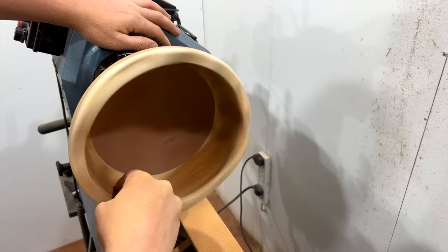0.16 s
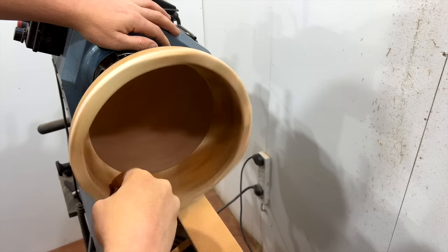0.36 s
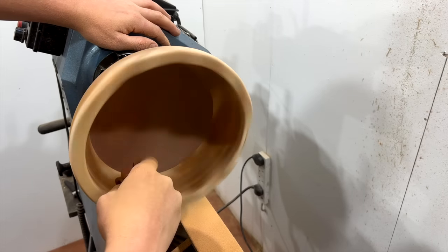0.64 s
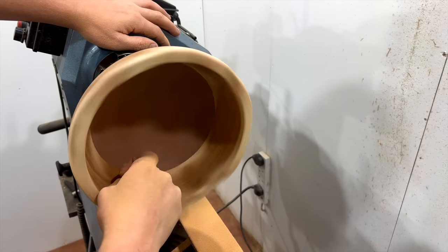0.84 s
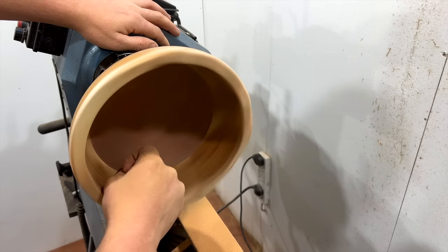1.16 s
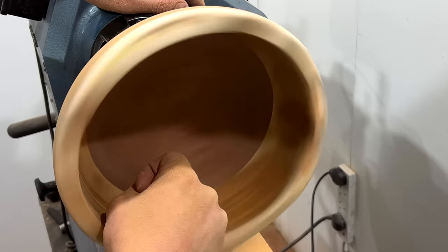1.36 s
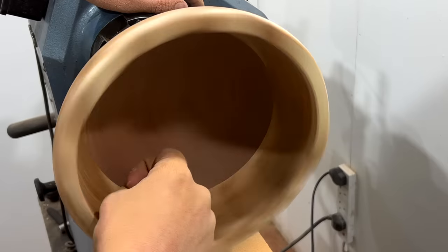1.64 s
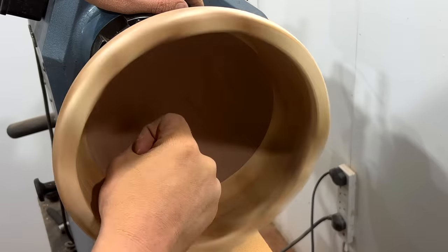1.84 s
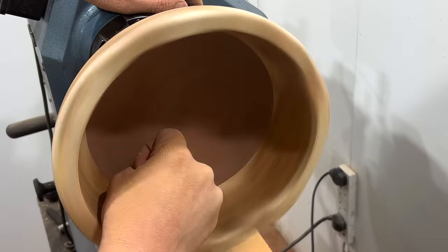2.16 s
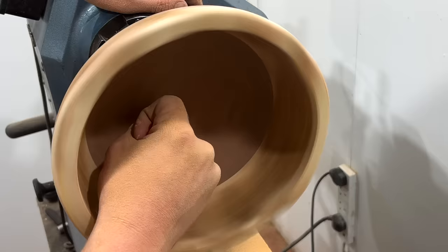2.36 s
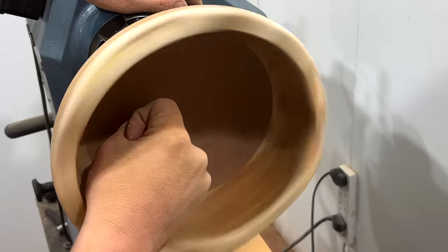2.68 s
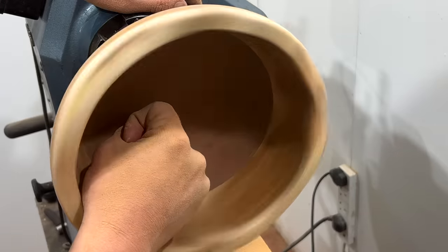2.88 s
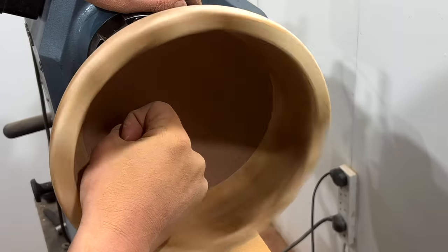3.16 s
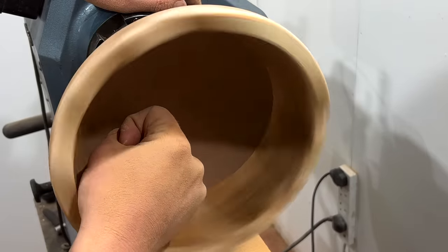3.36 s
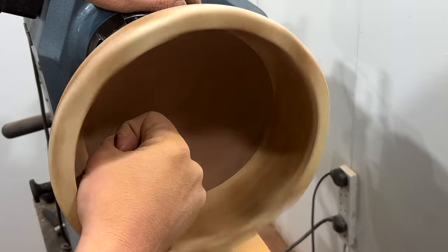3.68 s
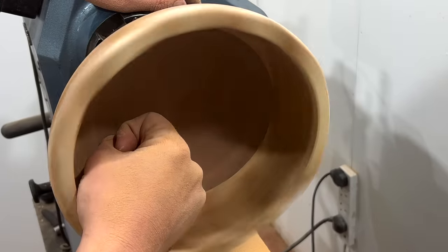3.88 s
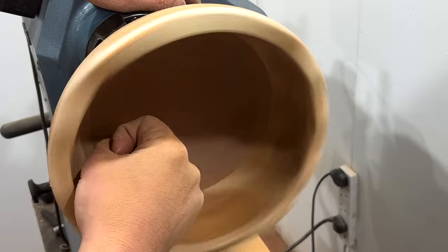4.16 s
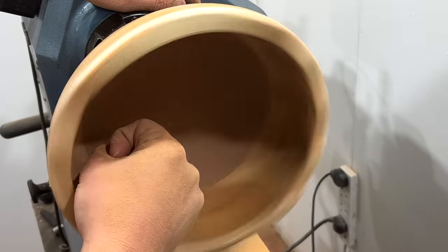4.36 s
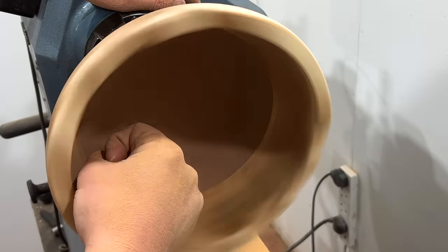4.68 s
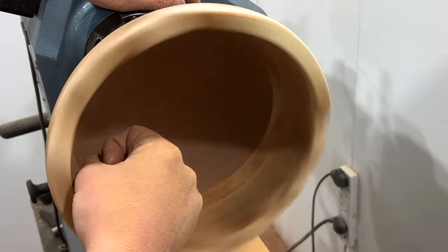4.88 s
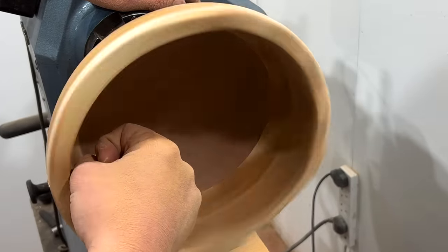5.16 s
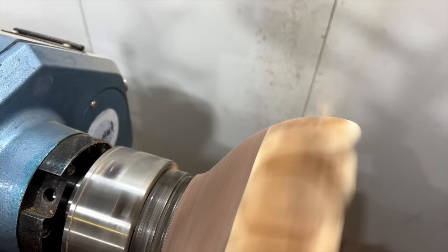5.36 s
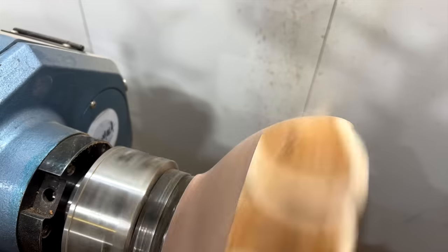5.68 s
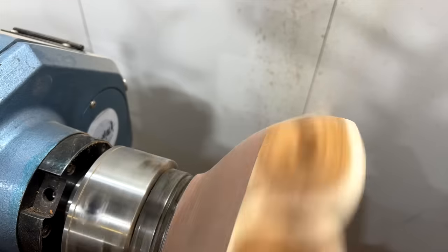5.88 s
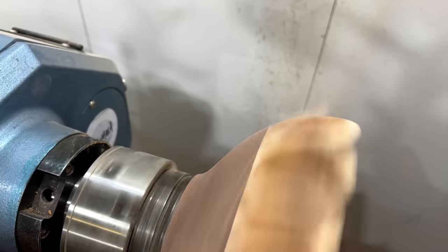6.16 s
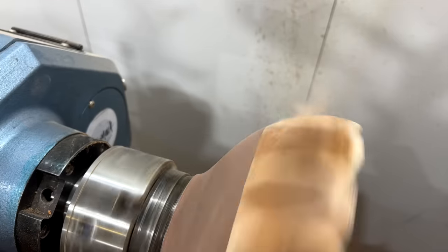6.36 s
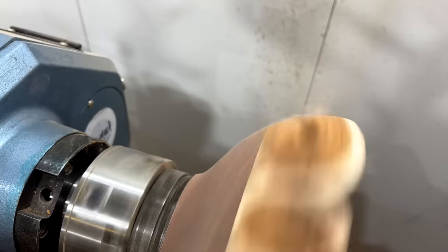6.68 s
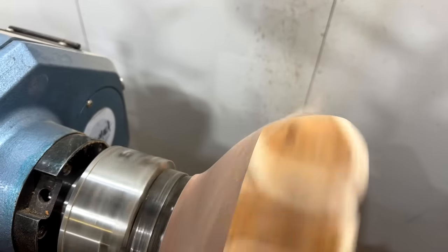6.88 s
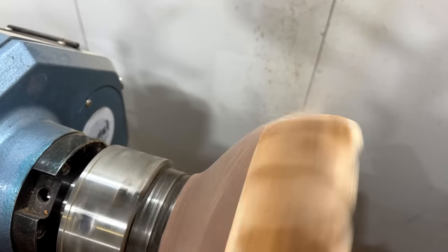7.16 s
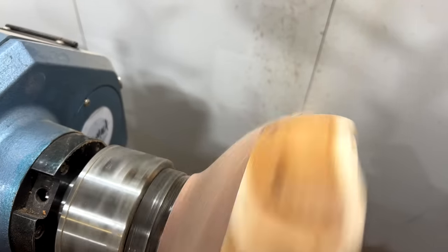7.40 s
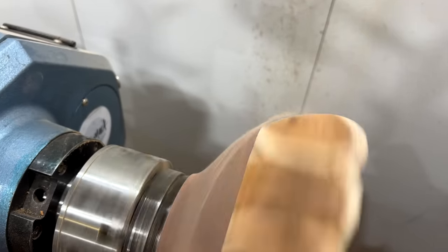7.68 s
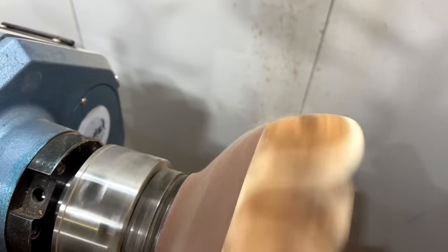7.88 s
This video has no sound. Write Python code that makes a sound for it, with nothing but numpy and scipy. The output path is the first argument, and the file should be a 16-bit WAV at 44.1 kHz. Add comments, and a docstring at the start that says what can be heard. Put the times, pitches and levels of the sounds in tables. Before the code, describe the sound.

Close stereo pickup facing a spinning wooden bowl: soft abrasive hiss, then a sudden firm press, with narrow singing chatter, short edge rasps and a woody ring. The hiss becomes smoother and the ring fades deep in the hollow. The sound then blends to a position by the lathe, where pulsing sanding of the outer wall rides over slowly swelling low drone, churning belt and whine, short room reflections around it.

```python
"""A wooden bowl spins on a lathe at about 900 rpm, in a dull workshop; sandpaper hisses with every turn.
At first the paper rests lightly, and two loose grains click. Then a hand presses it hard inside the bowl:
the stiff paper sings, its edge scuffs, and the bowl's wall rings. The hand goes deep, then comes back up;
the ring fades with depth and the air in the hollow hums. At about 5 s a short crossfade leads to a second
view, beside the headstock: the outer wall is rubbed, belt, whine and droning frame stand out; the hand eases off."""
import sys
import numpy as np
from scipy import signal
from scipy.fft import rfft, irfft, next_fast_len
from scipy.io import wavfile

SR = 44100
rng = np.random.default_rng(int(sys.argv[2]) if len(sys.argv) > 2 else 0)


def wav_out(sig):
    """Save sig, one row per channel (or a flat mono array), as 16-bit PCM at SR to the path in sys.argv[1]."""
    wavfile.write(sys.argv[1], SR, np.round(np.clip(np.atleast_2d(sig).T, -1, 1) * 32767).astype(np.int16))


N = 354123
TIME = np.arange(N) / SR
FREQ = np.arange(N // 2 + 1) * SR / N
SPINDLE_HZ = 15.15  # turns of the bowl per second


def undb(db):
    """Turn decibels into a gain."""
    return np.exp(np.asarray(db) * (np.log(10) / 20))


def unit(x):
    """Scale to an average strength (rms) of 1."""
    return x / np.sqrt(np.mean(x ** 2))


def curves(table):
    """Read each column of a time table, sample by sample."""
    s, *columns = np.transpose(table)
    return [np.interp(TIME, s, column) for column in columns]


def spectra(table):
    """Read each column of a frequency table, on a log-frequency axis."""
    hz, *columns = np.transpose(table)
    return [np.interp(np.log(FREQ + 1), np.log(hz), column) for column in columns]


def shape(x, response):
    """Filter a sound: scale (and shift) each frequency by the response."""
    size = next_fast_len(N)
    bins_hz = np.arange(size // 2 + 1) * SR / size
    return irfft(rfft(x, size) * np.interp(bins_hz, FREQ, response), size)[..., :N]


def mode(hz, width_hz):
    """Response of one resonance, with gain 1 at its centre."""
    damping = 1j * FREQ * width_hz
    return damping / (hz ** 2 - FREQ ** 2 + damping)


def noise():
    """White noise: all frequencies equally strong."""
    return rng.standard_normal(N)


def walk(rate):
    """A random wander with rms 1, drawn through this many points per second."""
    knots = rng.standard_normal(4096)
    return unit(np.interp(TIME * rate, np.arange(len(knots)), knots))


def ramp(start_s, length_s):
    """Rise from 0 to 1 in a straight line, then stay."""
    return np.clip((TIME - start_s) / length_s, 0, 1)


def bump(centre_s, half_s):
    """A smooth rise to 1 and fall."""
    return np.exp(-np.minimum(((TIME - centre_s) / half_s) ** 2, 20))


# the hand presses the paper on: start t/s, end t/s, attack/s, release/s, hiss level/dB above a light touch,
# angle of the high spot/turns, drift of that angle/turns per s, once-a-turn throb/dB, twice-a-turn throb/dB
HAND_PRESSES = [(.765, 1.625, .11, .125, 8.9, .45, .07, 2.6, .2),
                (1.56, 1.98, .12, .13, 8.4, .88, 0, 0, .5), (1.93, 2.34, .1, .035, 7.4, .92, 0, .5, 1.6),
                (2.31, 5.25, .48, .45, 5.0, .775, 0, .2, 1.5),
                (5.11, 8.55, .45, 1.45, 6.5, .715, .13, 2.75, .95)]


def pressing():
    """Hand pressure as dB above a light touch: each press rises, holds and lets go."""
    return np.max([db * ramp(start, attack) * (1 - ramp(end - release, release))
                   for start, end, attack, release, db, *_ in HAND_PRESSES], axis=0)


# the paper resting lightly: angle of the high spot in turns, throbs in dB
TOUCH_ANGLE, TOUCH_ONCE_DB, TOUCH_TWICE_DB = 0.16, 1, 0.7


def runout(settle_s=0.083):
    """The bowl runs out of true; each press meets its high spot at a new angle.

    Gives the angle in turns, the once-a-turn throb in dB and the twice-a-turn throb in dB."""
    state = np.array([[TOUCH_ANGLE], [TOUCH_ONCE_DB], [TOUCH_TWICE_DB]])
    for start, _, _, _, _, angle, drift, once_db, twice_db in HAND_PRESSES:
        held = np.array(np.broadcast_arrays(angle + drift * (TIME - start), once_db, twice_db))
        state = state + (held - state) * ramp(start - settle_s / 2, settle_s)
    return state


# the high spot shows most in the fine hiss: centre of band f/Hz, share of the throb (0-1)
THROB_SHARES = [(1500, 0.15), (3000, 0.36), (5000, 0.77), (7500, 0.88), (13000, 0.99)]


def grit(figure_db=0.74, flutter_db=0.64, grain_db=2.5, shift_db=0.36):
    """Countless grains scratch the wood, harder whenever a high spot or the end grain comes round."""
    angle, once_db, twice_db = runout()
    turn = SPINDLE_HZ * TIME - angle
    throb_db = once_db * np.cos(2 * np.pi * turn) - twice_db * np.cos(4 * np.pi * turn)
    # the wood's figure repeats on every turn; the paper flutters at random
    marks = rng.standard_normal(size=24)
    steps = unit(marks - np.roll(marks, 1))
    figure = np.interp(turn, np.arange(len(marks)) / len(marks), steps, period=1)
    grains = unit(noise() * undb(grain_db * noise()))
    grains = grains * undb(figure_db * figure + flutter_db * walk(260))
    # each band throbs by its own amount and wanders a little in level
    centres, shares = np.transpose(THROB_SHARES)
    bands = spectra(np.column_stack([centres, np.eye(len(centres))]))
    scratch = 0
    for band, share in zip(bands, shares):
        scratch = scratch + shape(grains, band) * undb(share * throb_db + shift_db * walk(30))
    return unit(scratch)


# colour of the grit: f/Hz, then level/dB for each grip:
# 0 light touch, 1 pressed on the inner wall, 2 deep in the hollow, 3 outer wall
GRIP_COLOURS = [(760, -17, -27.5, -29.5, -26.5), (1420, -14, -20, -18, -23), (2080, -16.5, -23, -21.5, -23),
                (2860, -12, -12.5, -9.5, -12.5), (3460, -7.5, -7.5, -7.5, -10.5),
                (4100, -7.5, -6, -5.5, -6), (4860, -0.5, 0, 0, -2.5), (6620, -6, -3, -1.5, -7.5),
                (6960, -5.5, -0.5, -2, -8), (8610, -3, -1.5, 1.5, -0.5), (9960, -17, -9.5, -7, -10),
                (11280, 1, -2, -1, -1.5), (13300, -5.5, -4.5, -4.5, -3), (15500, 0, -6, -7.5, 0)]
# the hand changes grip: t/s, grip number (0-3, as above)
GRIP_CHANGES = [(.71, 0), (.82, 1), (2.3, 1), (2.4, 2), (4.95, 2), (5.42, 3)]
# wall resonances that colour the hiss: f/Hz, width/Hz, lift level/dB
WALL_RESONANCES = [(1713, 86, 5.5), (1900, 68, -1.5), (2136, 63, 2.5), (2437, 187, 9), (2690, 120, -7),
                   (2863, 126, 3), (3176, 150, 2.5), (4080, 140, 2.5), (4250, 130, -2), (4880, 110, 1),
                   (5100, 170, 0.5)]
# the top treble: t/s, level/dB relative to the hiss
TREBLE_LEVEL = [(0, -0.5), (.5, -0.5), (.84, -5.5), (1.15, 0.5), (1.35, -3), (1.6, -2), (1.8, -8),
                (2.2, -5), (2.5, -5.5), (2.9, -4), (4.5, -3.5), (5.4, -2), (7.3, -3.5), (8.03, -3.5)]
TOUCH_DB = -31.5  # hiss level under a light touch
# the coarse low hiss: level at a light touch, dB lost per dB of pressing, change at the bottom and outside
COARSE_DB, COARSE_LOSS, COARSE_BOTTOM_DB, COARSE_OUTSIDE_DB = -8, 0.35, -7.5, -1


def sanding(scratch, near, depth, grip_db=(0, 0, 0, 0), coarse_hz=3550, fine_hz=10500, depth_power=3.8):
    """The scratching takes the colour of each grip; pressing harder weakens its coarse low part."""
    press_db = pressing()
    coarse_db = COARSE_DB - COARSE_LOSS * press_db
    coarse_db = coarse_db + COARSE_BOTTOM_DB * depth ** depth_power + COARSE_OUTSIDE_DB * near
    fine_db = curves(TREBLE_LEVEL)[0]
    grip = curves(GRIP_CHANGES)[0]
    wall = 1 + sum((undb(db) - 1) * np.abs(mode(hz, width)) ** 2 for hz, width, db in WALL_RESONANCES)
    below = 1 / (1 + (FREQ / coarse_hz) ** 10)
    above = 1 - 1 / (1 + (FREQ / fine_hz) ** 10)
    core = (FREQ > 4000) & (FREQ < 8800)  # every grip is made equally strong in this band
    out = 0
    for k, colour_db in enumerate(spectra(GRIP_COLOURS)):
        share = np.clip(1 - np.abs(grip - k), 0, 1)
        colour = undb(colour_db) * wall
        hiss = shape(scratch, colour / np.sqrt(np.mean(core * colour ** 2)))
        # the grip's colour holds on average; the tilts only move around it
        for band, tilt_db in (below, coarse_db), (above, fine_db):
            tilt_gain = undb(tilt_db - np.average(tilt_db, weights=share))
            hiss = hiss + shape(hiss, band) * (tilt_gain - 1)
        out = out + hiss * np.sqrt(share) * undb(grip_db[k])
    return out * undb(TOUCH_DB + press_db)


# sheen around the paper's own resonance: t/s, lift level/dB
SHEEN_LIFT = [(0, -1.5), (.5, -3.5), (.7, 1), (.9, -1.5), (1.4, -0.5), (2.3, -1.5), (3.5, 1), (4.6, 1),
              (5.2, -3.5), (5.9, 0.5), (6.4, 2), (7.1, 1.2), (7.7, 5.5)]
SHEEN_HZ, SHEEN_WIDTH_HZ = 7640, 1600
# rasp lower in the hiss: t/s, lift level/dB
RASP_LIFT = [(0, 0), (.7, 0.5), (.95, -3.5), (1.25, 0.5), (1.8, 1), (2.3, -0.5), (2.5, 3), (2.75, -0.5),
             (3.1, -1), (4.5, 0), (7, 1), (8, -2)]
RASP_HZ, RASP_WIDTH_HZ = 4930, 690


def sheen(hiss):
    """The paper's bright sheen and its lower rasp come and go in the hiss."""
    out = hiss
    for lift, hz, width in (SHEEN_LIFT, SHEEN_HZ, SHEEN_WIDTH_HZ), (RASP_LIFT, RASP_HZ, RASP_WIDTH_HZ):
        out = out + shape(hiss, np.abs(mode(hz, width)) ** 2) * (undb(curves(lift)[0]) - 1)
    return out


# the paper's edge catches: t/s, half length/s, centre f/Hz, width/Hz, level/dB
EDGE_SCUFFS = [(.822, 0.021, 7400, 1100, -23), (.885, .024, 7500, 1400, -24), (.889, .024, 5770, 1000, -25),
               (.955, 0.022, 6400, 1200, -27), (1.016, 0.014, 7650, 1800, -25),
               (1.286, .018, 4960, 1408, -21.5), (1.352, .02, 4920, 1200, -23.5),
               (1.818, .005, 6000, 4000, -27), (2.058, .007, 7300, 3000, -22),
               (2.127, .006, 7000, 4000, -25), (2.198, .007, 6500, 4000, -23.5),
               (2.255, 0.011, 5100, 1600, -22.5)]


def scuffs():
    """The paper's edge catches the wood: short bright rasps, each with a colour of its own."""
    rasp = noise()
    return sum(unit(shape(rasp, mode(hz, width) ** 2)) * undb(db) * bump(s, half_s)
               for s, half_s, hz, width, db in EDGE_SCUFFS)


# pressed hard on the inner wall, the paper sings: t/s, level/dB
SINGING_LEVEL = [(.72, -69), (.86, -35), (1.1, -34.5), (1.3, -36), (1.55, -35), (1.66, -68)]
SING_HZ = 4010


def singing(scratch, width_hz=310):
    """The stiff paper chatters in a narrow band."""
    level_db = curves(SINGING_LEVEL)[0]
    return unit(shape(scratch, mode(SING_HZ, width_hz) ** 2)) * undb(level_db)


# coarse grains snap off the paper: t/s, starting level/dB of the fading click
GRAIN_SNAPS = [(.070, -15), (0.133, -10)]


def ticks(ring_hz=12500, decay_s=.00025):
    """A snapping grain gives a tiny bright click that dies away at once."""
    out = np.zeros(N)
    for s, db in GRAIN_SNAPS:
        age = np.maximum(TIME - s, 0)
        out += undb(db) * np.exp(-age / decay_s) * np.sin(2 * np.pi * ring_hz * age)
    return out


# the bowl's ring flares briefly: t/s, lift level/dB
RING_FLARES = [(.83, 4.5), (1.47, 3), (2.09, 9), (4.48, 6.5)]
FLARE_S = 0.051  # half length of a flare
# the ring: level when rubbed at the rim, change at the bottom and on the outer wall
RING_RIM_DB, RING_BOTTOM_DB, RING_OUTSIDE_DB = -43.5, -24, -3
# air in the hollow: pitch with the hand at the rim and at the bottom, level
HOLLOW_OPEN_HZ, HOLLOW_CLOSED_HZ, HOLLOW_DB = 1447, 1173, -52


def bowl(scratch, near, depth, ring_hz=953, ring_width_hz=58, skirt_hz=520, low_hz=382, low_db=-12,
         damped_hz=952, damped_width_hz=175, hollow_width_hz=115):
    """Rubbing rings the wall, most at the rim; the air in the hollow drops in pitch as the hand goes deeper."""
    free = unit(shape(scratch, mode(ring_hz, ring_width_hz) * mode(ring_hz, skirt_hz)))
    free = free + undb(low_db) * unit(shape(scratch, mode(low_hz, 42) ** 2))
    # a hand on the outer wall damps the ring and widens it
    damped = unit(shape(scratch, mode(damped_hz, damped_width_hz) ** 2))
    flare_db = sum(db * bump(s, FLARE_S) for s, db in RING_FLARES)
    ring_db = flare_db + RING_RIM_DB + RING_BOTTOM_DB * depth + RING_OUTSIDE_DB * near
    ring = (free * (1 - near) + damped * near) * undb(ring_db)
    # a band of noise whose centre glides with the hand
    air_hz = HOLLOW_OPEN_HZ + (HOLLOW_CLOSED_HZ - HOLLOW_OPEN_HZ) * depth
    sway = shape(np.array([noise(), noise()]), 1 / (1 + (FREQ / hollow_width_hz) ** 2))
    cycle = 2 * np.pi * np.cumsum(air_hz) / SR
    air = unit(sway[0] * np.cos(cycle) + sway[1] * np.sin(cycle))
    hand_inside = np.interp(TIME, [1.55, 1.8, 4.9, 5.3], [0, 1, 1, 0])
    return ring + air * hand_inside * undb(HOLLOW_DB)


# crests of the drone's swell, about one a second: t/s, level/dB
SWELL_CRESTS = [(4.5, 1), (5.53, 0.5), (6.5, -0.5), (7.38, 0.5), (8.2, -0.5)]
SWELL_DEPTH = .66  # strength of the second vibration beside the first


def beat():
    """Gain of two vibrations that drift in and out of step."""
    times, crest_db = np.transpose(SWELL_CRESTS)
    cycle = np.interp(TIME, times, np.arange(len(times)))
    return np.abs(1 + SWELL_DEPTH * np.exp(2j * np.pi * cycle)) * undb(np.interp(TIME, times, crest_db))


def tone(hz, waver=0.18):
    """A machine tone of rms 1 whose phase wanders a little."""
    return np.sqrt(2) * np.sin(2 * np.pi * (hz * TIME + rng.random()) + waver * walk(3))


# resonances of the motor housing: f/Hz, width/Hz, level/dB
HOUSING_RESONANCES = [(332.5, 15, 3), (372, 37, -11), (445, 26, 5.5), (552, 140, -8)]
# harmonics of the belt's lap: multiple of the lap rate, level/dB before the swell
BELT_HARMONICS = [(9, -47), (10, -51), (11, -61), (12, -44.5), (13, -47.5), (14, -47.5), (15, -59),
                  (20, -47.5), (21, -52.5), (22, -56), (23, -52), (24, -52), (34, -63), (38, -61)]
BELT_HZ = 12.326  # laps of the belt per second
# steady whining tones beside the headstock, most spaced about one belt lap rate apart: f/Hz, level/dB
WHINE_TONES = [(318.3, -49.5), (330.5, -52.5), (342.8, -57), (354.9, -45.5), (367.2, -49.5), (379.4, -52.5),
               (441.4, -60.5), (453.7, -55)]
# the motor's own tone: pitch, level beside the headstock, change in the first view
MOTOR_HZ, MOTOR_DB, MOTOR_FAR_DB = 742, -53, -19.5
# motor rumble and frame drone: level with a light hand at the rim, change at the bottom,
# level beside the headstock (before the swell, for the drone)
RUMBLE_RIM_DB, RUMBLE_BOTTOM_DB, RUMBLE_NEAR_DB = -53.5, -4, -53
DRONE_RIM_DB, DRONE_BOTTOM_DB, DRONE_NEAR_DB = -51, -4, -36
# rubbing at the rim makes the lathe shudder: centre, width, level, change with the hand at the bottom
SHUDDER_HZ, SHUDDER_WIDTH_HZ, SHUDDER_RIM_DB, SHUDDER_BOTTOM_DB = 78, 85, -58, -16
# the first hard press jolts the frame: time, attack, decay, level of drone and of rumble
JOLT_S, JOLT_ATTACK_S, JOLT_DECAY_S, JOLT_DRONE_DB, JOLT_RUMBLE_DB = 0.816, 0.036, 0.049, -40.5, -52


def lathe(near, depth, drone_power=1.64, whine_power=0.93, upper_db=-7, hum_hz=144, hum_db=-60.0,
          churn_db=-47, whine_far_db=-32, waver=0.33, steadying=0.23, belt_swell=.35, churn_swell=0.76):
    """The motor hums and rumbles in its housing, the frame drones; belt and whine stand out by the headstock."""
    swell = beat()
    # light rubbing at the rim shakes the machine most; a firm hand steadies it
    shaken = (1 - near) * undb(-steadying * pressing())
    jolt_decay = np.exp(-np.maximum(TIME - JOLT_S - JOLT_ATTACK_S, 0) / JOLT_DECAY_S)
    jolt = ramp(JOLT_S, JOLT_ATTACK_S) * jolt_decay
    rumble_gain = shaken * undb(RUMBLE_RIM_DB + RUMBLE_BOTTOM_DB * depth)
    rumble_gain = rumble_gain + near * undb(RUMBLE_NEAR_DB) + jolt * undb(JOLT_RUMBLE_DB)
    drone_gain = shaken * undb(DRONE_RIM_DB + DRONE_BOTTOM_DB * depth)
    drone_gain = drone_gain + near ** drone_power * swell * undb(DRONE_NEAR_DB) + jolt * undb(JOLT_DRONE_DB)
    housing_colour = sum(undb(db) * np.abs(mode(hz, width)) ** 2 for hz, width, db in HOUSING_RESONANCES)
    housing = unit(shape(noise(), housing_colour))
    hum = undb(hum_db) * (tone(hum_hz, waver=1.2) + 0.57 * unit(shape(noise(), mode(hum_hz, 31) ** 2)))
    # three harmonics of the belt fall on the frame's resonance and swell with it
    resonant = tone(19 * BELT_HZ) + .3 * tone(18 * BELT_HZ, .6) + .25 * tone(17 * BELT_HZ, .4)
    frame_colour = np.abs(mode(221.6, 32)) ** 2 + undb(upper_db) * np.abs(mode(253, 47)) ** 2
    frame = unit(shape(noise(), frame_colour)) * (1 - 0.35 * near) + 0.62 * near * resonant
    # the belt runs unevenly: a churning rumble lies between its harmonics
    belt = sum(undb(db) * tone(np.round(k) * BELT_HZ, waver) for k, db in BELT_HARMONICS)
    churn = undb(churn_db) * swell ** churn_swell * unit(shape(noise(), mode(143, 86) ** 2))
    whine_share = near ** whine_power
    whine = sum(undb(db) * tone(hz, waver=0.1) for hz, db in WHINE_TONES)
    whine = whine * np.maximum(whine_share, undb(whine_far_db))
    motor = undb(MOTOR_DB) * tone(MOTOR_HZ, waver=0.05) * np.maximum(whine_share, undb(MOTOR_FAR_DB))
    shudder = unit(shape(noise(), mode(SHUDDER_HZ, SHUDDER_WIDTH_HZ) ** 2))
    shudder = shudder * shaken * undb(SHUDDER_RIM_DB + SHUDDER_BOTTOM_DB * depth)
    belt_drive = near * (belt * swell ** belt_swell + churn)
    return housing * rumble_gain + shudder + hum + frame * drone_gain + belt_drive + whine + motor


# colour of the workshop background: f/Hz, level/dB
SHOP_COLOUR = [(20, -24), (45, 3), (100, 3), (190, -7), (300, -19), (550, -0.5), (800, -11.5), (2000, -5),
               (8000, -52)]


def workshop(shop_db=-56.2, side_db=-15, swell_db=-58):
    """A dull background of filtered noise, with one brief swell of deep rumble."""
    colour = undb(spectra(SHOP_COLOUR)[0])
    mid, side = (unit(shape(noise(), colour)) for _ in range(2))
    swell_gain = np.interp(TIME, [1.6, 1.7, 1.95, 2.1], [0.17, 1, 0.77, 0.0037])
    swell = unit(shape(noise(), mode(42, 40) ** 2)) * swell_gain
    background = mid + undb(side_db) * side * np.array([[1], [-1]])
    return undb(shop_db) * background + undb(swell_db) * swell


def reflections(x, t60_s):
    """A dense tail of random echoes, with about the same power as the sound; t60 is the time to fall 60 dB."""
    t = TIME[:SR // 3]
    echoes = rng.standard_normal(len(t)) * np.exp(-np.log(1000) * t / t60_s)
    return signal.fftconvolve(x, echoes / np.linalg.norm(echoes))[:N]


# two microphone ports facing the hollow:
# f/Hz, phase lead of the left/radians, share of direct sound (0-1), left minus right level/dB
PORTS_AT_HOLLOW = [(200, -1, .8, 0), (1280, 0.23, .4, 2), (3000, 1.8, 0.46, 1), (3800, 2.16, 0.1, 4),
                   (4200, 0.5, 0.5, 1.5), (4900, 0.4, 0.68, 7), (5640, -1, 0.4, 5.5), (7160, 0, 0.9, -0.7),
                   (8370, -0.9, 0.52, 5), (8920, -2.5, 0.7, 0.5), (9230, -3, 1, -1), (10770, -3.5, 1, 0),
                   (11200, -4, 0.74, 0.5), (11930, -5, .65, -0.5), (12800, -6, .98, 0), (14600, -8, .98, 0),
                   (15400, -8, .55, 0)]
# the same columns beside the headstock
PORTS_AT_HEADSTOCK = [(200, 0, 0.65, 1), (1280, .3, 0.42, 0.5), (3500, 1.67, 0.2, 2), (5000, 1.15, .25, 11),
                      (6100, 3, .1, 4.5), (7150, 0.5, 0.61, 3.5), (8370, -1.4, 0.55, 2.1),
                      (8870, -2.5, 0.83, 1), (9220, -3, 1, -1), (10780, -3.5, 1, 1), (11170, -4, 0.73, -1),
                      (12100, -5.5, .7, 0.5), (12800, -6, 0.94, -1), (14300, -7.5, .98, 1),
                      (15400, -8, .7, -1)]


def ports(x, near, t60_s=0.082, swing=1.22, drift=1.41):
    """Each port hears the direct sound with its own lag, plus quick reflections that shift with bowl and hand."""
    wobble = swing * np.sin(2 * np.pi * SPINDLE_HZ * TIME)
    # lag and share of direct sound both change across the crossfade
    places = (spectra(PORTS_AT_HOLLOW), 1 - near), (spectra(PORTS_AT_HEADSTOCK), near)
    out = np.zeros((2, N))
    for channel, sign in enumerate((1, -1)):
        facing = wobble + drift * walk(3)
        scattered = reflections(x, t60_s) * np.cos(facing) + reflections(x, t60_s) * np.sin(facing)
        for (lead, direct, pan_db), share in places:
            direct = np.clip(direct, 0, 1)
            pan = np.sqrt(2 / (1 + undb(-2 * sign * pan_db)))
            straight = shape(x, pan * np.sqrt(direct) * np.exp(.5j * sign * lead))
            bounced = shape(scattered, pan * np.sqrt(1 - direct))
            out[channel] += share * (straight + bounced)
    return out


def across_room(x, lag_s=0.0004, pan_db=1.2, room_db=-9, wide_hz=480, t60_s=0.14):
    """The lathe stands a little to the left; its echoes spread wider as the pitch rises."""
    side = shape(reflections(x, t60_s), undb(room_db) * np.minimum(FREQ / wide_hz, 1))
    return np.array([shape(x, undb(sign * pan_db / 2) * np.exp(1j * np.pi * sign * FREQ * lag_s)) + sign * side
                     for sign in (1, -1)])


# crossfade to the view beside the headstock: t/s, share (0-1)
HEADSTOCK_VIEW = [(4.9, 0), (5.09, 0.32), (5.27, 0.41), (5.5, 1)]
# how far the hand reaches down the bowl's wall: t/s, depth (0 at the rim to 1 at the bottom)
HAND_DEPTH = [(0, 0.2), (.9, 0.045), (1.35, 0.382), (1.9, 0.64), (2.25, 0.76), (2.4, 1), (3.0, 0.93),
              (3.75, 0.73), (4.5, 0.47), (5.3, 0.34)]


def scene():
    """Sanding and bowl at the two ports, over the lathe and the workshop."""
    near = np.clip(curves(HEADSTOCK_VIEW)[0], 0, 1)
    depth = np.clip(curves(HAND_DEPTH)[0], 0, 1)
    scratch = grit()
    paper = sheen(sanding(scratch, near, depth)) + scuffs() + singing(scratch) + ticks()
    rubbing = paper + bowl(scratch, near, depth)
    return ports(rubbing, near) + across_room(lathe(near, depth)) + workshop()


TOP_HZ = 15740  # the highest treble kept


def record(dry):
    """The recorder cuts the top with a steep low-pass filter."""
    return signal.sosfilt(signal.ellip(10, .2, 80, TOP_HZ, fs=SR, output="sos"), dry)


dry = scene()
out = record(dry)
wav_out(out)
```